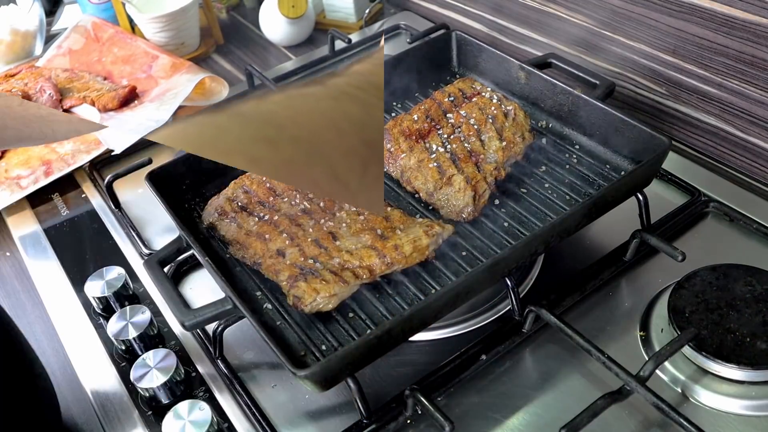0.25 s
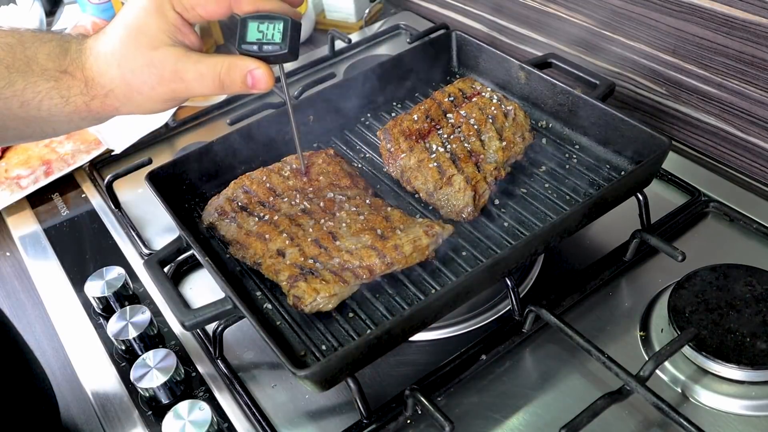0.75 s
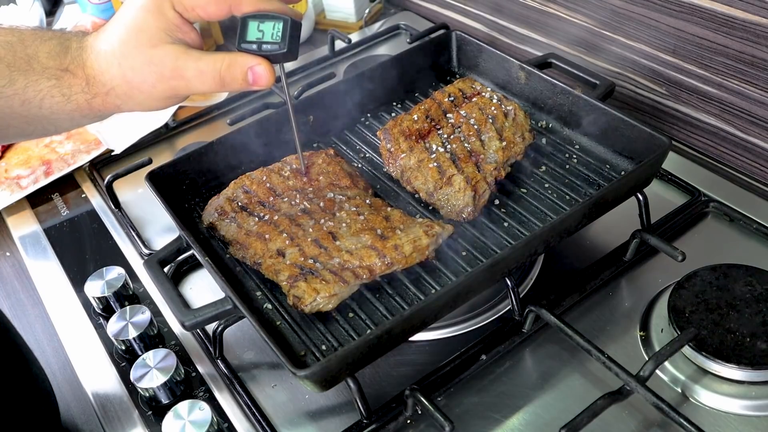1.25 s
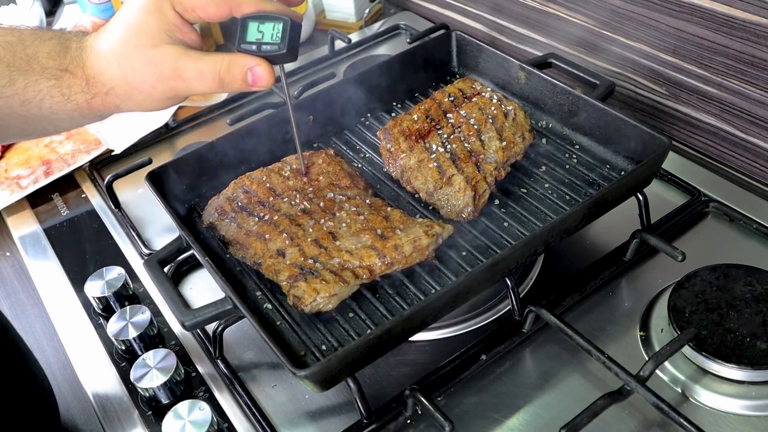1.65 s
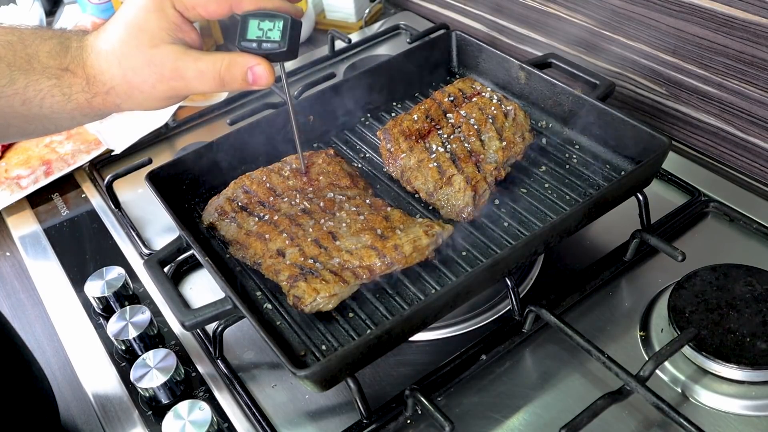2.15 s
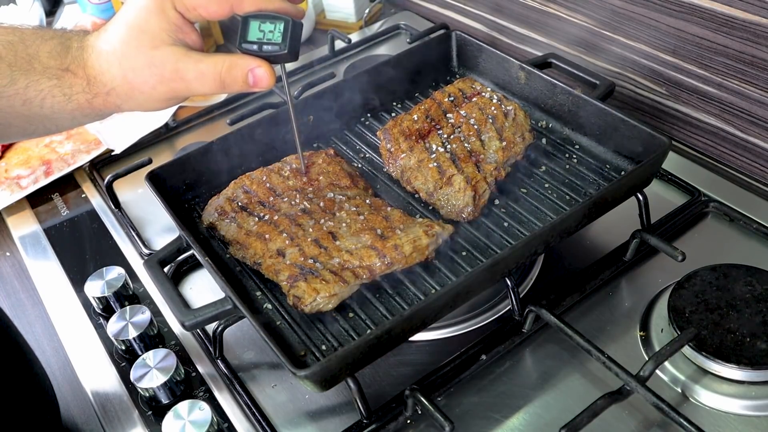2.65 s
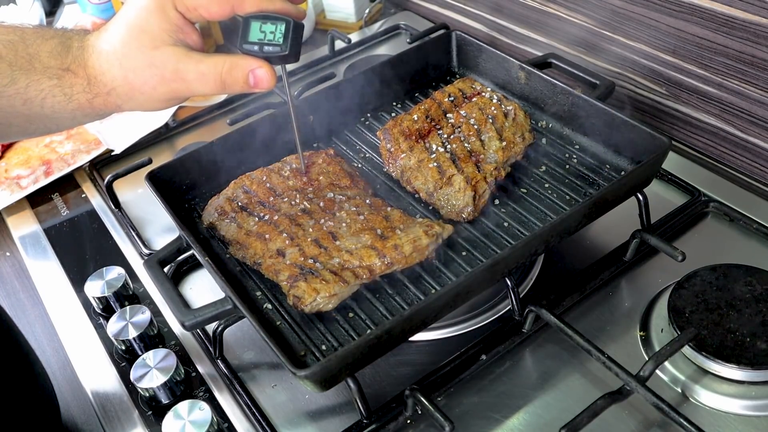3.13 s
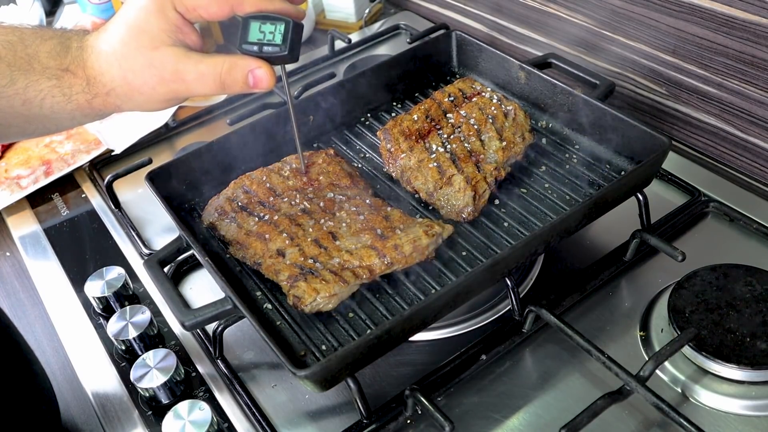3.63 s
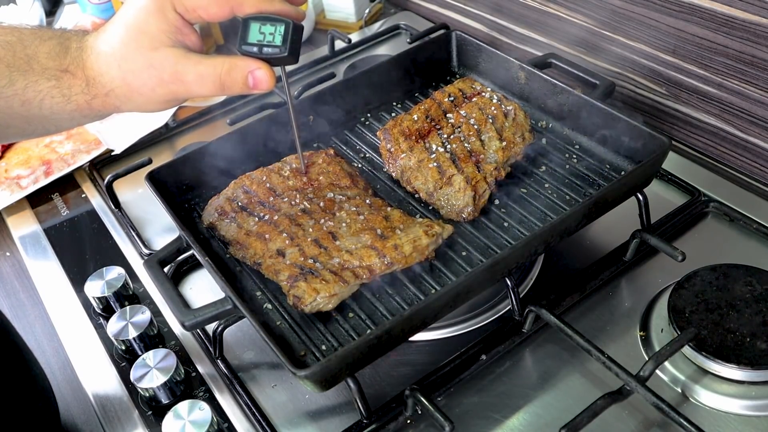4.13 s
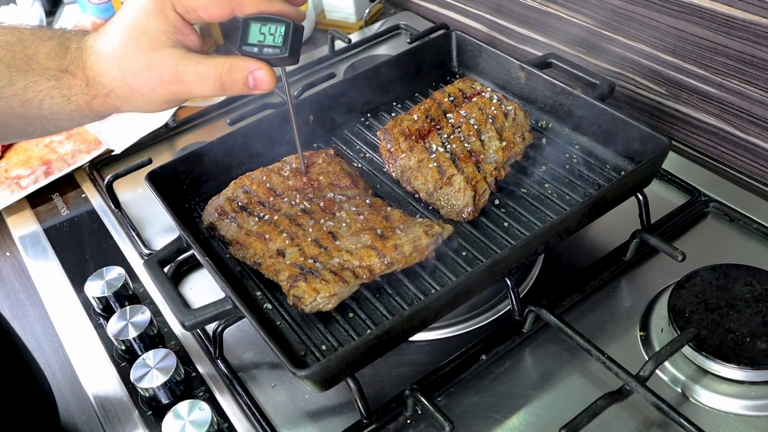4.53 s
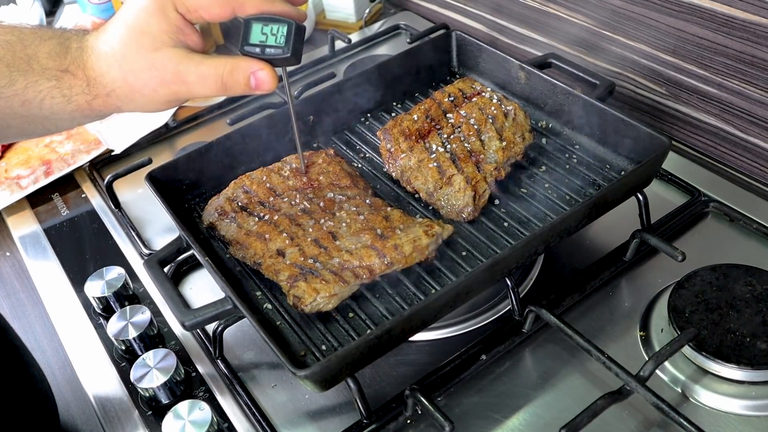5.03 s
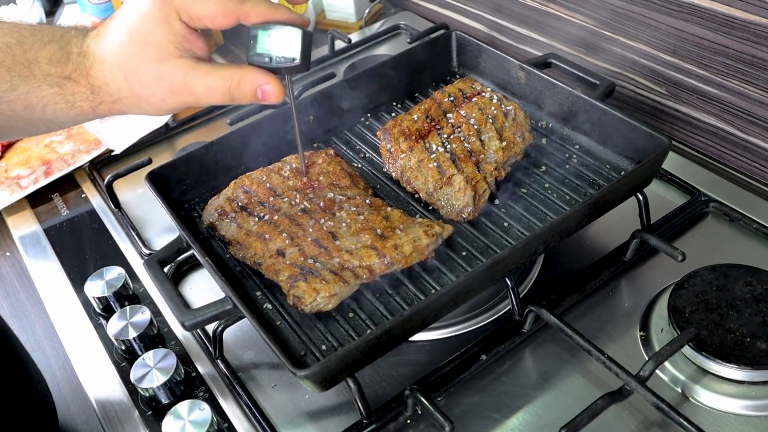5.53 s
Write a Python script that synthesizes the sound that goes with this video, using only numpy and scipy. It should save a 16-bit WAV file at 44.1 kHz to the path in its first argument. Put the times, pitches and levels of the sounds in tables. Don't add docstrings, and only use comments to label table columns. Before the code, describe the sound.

Two steaks fry with a bright continuous hiss, brief sputtering flares and snapping fat, over a soft fan hum in a kitchen.

```python
import sys
import numpy as np
from scipy import signal
from scipy.fft import rfft, irfft, next_fast_len
from scipy.io import wavfile
from scipy.ndimage import uniform_filter1d, map_coordinates

SR = 44100
rng = np.random.default_rng(int(sys.argv[2]) if len(sys.argv) > 2 else 0)


def field_ratio(decibels):
    return 10 ** (np.asarray(decibels, dtype=float) / 20)


def to_wav(s):
    ch = np.atleast_2d(s).T
    pcm = np.round(np.clip(ch, -1, 1) * 32767)
    wavfile.write(sys.argv[1], SR, pcm.astype(np.int16))


N = 255202


def unit(x):
    return x / np.sqrt(np.mean(x ** 2) + 1e-20)


def along(points, hz):
    f, value = np.transpose(points)
    return np.interp(np.log(hz + 1), np.log(f + 1), value)


def wobble(rate):
    knots = rng.standard_normal(int(N * rate / SR) + 4)
    return map_coordinates(knots, [np.arange(N) * rate / SR])


def filtered(x, response):
    size = next_fast_len(len(x) + SR // 2)
    return irfft(rfft(x, size) * response(np.fft.rfftfreq(size, 1 / SR)), size)[:len(x)]


def resonance(f, hz, width):
    return 1j * f * width / (hz * hz - f * f + 1j * f * width)


def patchy(db):
    z = signal.stft(rng.standard_normal(N), nperseg=256)[2]
    field = uniform_filter1d(rng.standard_normal(z.shape), size=6, axis=0)
    field = uniform_filter1d(field, size=5, axis=1)
    uneven = z * field_ratio(np.clip(db, 0, 2) * unit(field))
    return unit(signal.istft(uneven, nperseg=256)[1][:N])


def bursts(rate, spread_db):
    size_db = np.minimum(spread_db * rng.exponential(size=N), 3.5 * spread_db)
    return unit((rng.random(N) < rate / SR) * field_ratio(size_db))


# frequency in Hz, level in dB per Hz.
AIRFLOW = [(15, -30), (30, -10), (50, -13), (80, -3), (100, -1), (116, -2.5), (138, -1), (259, -3.5),
           (310, -1), (479, -2.5), (650, -3.5), (900, 0), (1170, -20), (1980, -120)]
# order (multiple of the shaft speed), level in dB.
SHAFT = [(2, -66), (3, -57), (4, -79), (6, -72), (10, -67)]


def extractor():
    shaft_hz = 20.56 * (1 + 0.0032 * wobble(1.35))
    turn = 2 * np.pi * np.cumsum(shaft_hz) / SR
    hum = sum(field_ratio(db + 4 + 0.92 * wobble(2.64)) * np.sin(order * turn + 5.1 * rng.random())
              for order, db in SHAFT)
    rush = unit(filtered(patchy(0.81), lambda f: field_ratio(along(AIRFLOW, f))))
    return hum + field_ratio(-47.5 + 1.47) * rush


# start in seconds, pitch in Hz, level in dB, length in seconds.
THUDS = [
    (4.916, 270, -45.5, 0.12),
    (4.946, 215, -50, 0.24),
]


def thuds():
    t = np.arange(N) / SR
    out = np.zeros(N)
    for start, hz, db, life in THUDS:
        swell = np.exp(-((t - start - life / 2) / (life / 2)) ** 2)
        rumble = filtered(rng.standard_normal(N), lambda f: resonance(f, hz, .5 * hz) ** 2)
        out += field_ratio(db) * swell * unit(rumble)
    return out


def kitchen(x):
    t60_s = 0.56
    t = np.arange(SR // 2) / SR
    tail = rng.standard_normal(len(t)) * field_ratio(-60 * t / t60_s) * (t > .003)
    wet = signal.fftconvolve(x, tail / np.linalg.norm(tail))[:N]
    return filtered(wet, lambda f: 1 / (1 + 1j * f / 7000))


# delay in seconds, gain (negative flips the pulse).
WALLS = [(0.00034, 0.18), (0.00045, 0.18), (0.00052, 0.25), (0.00068, -0.21), (0.00082, 0.2),
         (0.00091, -0.21), (0.00116, -0.09), (0.00127, 0.1), (0.00134, 0.5), (0.00143, -0.14),
         (0.00159, -0.18), (0.0017, 0.12), (0.00215, 0.16), (0.00234, -0.14), (0.00311, -0.11),
         (0.00404, 0.09)]


def echoes(f, shifts=0., db=0.):
    delay, gain = np.transpose(WALLS)
    return 1 + field_ratio(db) * sum(g * np.exp(-2j * np.pi * f * s) for s, g in zip(delay + shifts, gain))


# frequency in Hz, width in Hz, level in dB.
PAN = [(723, 36, 17.5), (923, 62, 3.5), (1349, 118, 4), (2080, 760, -3.5), (2820, 235, 6),
       (3955, 1100, -5.5), (4740, 130, -2), (6180, 83, -3)]


def iron(f, db):
    return 1 + field_ratio(db) * sum(field_ratio(level) * resonance(f, hz, width) for hz, width, level in PAN)


# time in seconds, vigour in dB.
HEAT = [(0, -26.5), (.2, -27.5), (.6, -25.5), (1.15, -26), (1.95, -25), (2.15, -24.5), (2.35, -24),
        (2.65, -23.5), (2.95, -22.5), (3.3, -24), (4.2, -25), (4.9, -24.5), (5.48, -25), (5.79, -20.5)]
# start in seconds, rise in dB, fade in seconds, fineness from jet 0 to spray 1.
FLARES = [(.17, 4, 0.067, 0.2), (.33, 5, 0.039, .3), (1.5, 2.5, 0.056, .6), (2.25, 7, 0.065, 0.5),
          (2.36, 4, 0.055, 0.1), (2.41, 6, 0.036, 0.3), (2.52, 2, 0.045, .1), (2.87, 3.5, 0.082, .9),
          (3.1, -0.5, 0.054, .1), (3.8, 4.5, 0.13, .55), (4.226, 8, .04, 0.1), (4.28, 3, .06, 0.8),
          (4.62, 1.5, 0.053, 0.5), (4.75, 0.5, .3, .95), (5.2, 2.5, .08, 1)]


def vigour():
    calm_db, attack_s, simmer_share = -26, 0.011, 0.24
    t = np.arange(N) / SR
    flares_db = 0
    for start, db, fade, fine in FLARES:
        shape = np.exp(np.minimum((t - start) / attack_s, (start - t) / fade))
        shares = np.array([[simmer_share], [1 - fine ** 2], [1 - (1 - fine) ** 2]])
        flares_db = flares_db + db * shape * shares
    return np.interp(t, *np.transpose(HEAT)) - calm_db, flares_db


def boiling(spectrum, grain_db, rate, spread_db, patchy_db, echo_db):
    grains = bursts(rate, spread_db) * np.sign(rng.standard_normal(N))
    raw = patchy(patchy_db) + field_ratio(grain_db) * grains
    return unit(filtered(raw, lambda f: field_ratio(along(spectrum, f)) * echoes(f, db=min(echo_db, -6)) * iron(f, -3.2)))


# frequency in Hz, level in dB per Hz.
SIMMER = [(300, -49), (640, -27), (720, -19.5), (1130, -2.5), (1400, -3.5), (1900, -2), (2400, -5),
          (2620, -4.5), (2850, -7.5), (3240, -4), (3800, -2), (5600, -2), (7500, -1), (10400, -18)]
STEAM = [(3500, -27), (5500, -12), (6900, -5), (7700, -0.5), (8400, 1.5), (9100, -1), (10500, -9.5),
         (13000, -53), (20000, -120)]
SPRAY = [(6500, -30), (10000, -8), (11000, -4), (12600, 0), (13600, -1), (14700, -4)]
# calm level in dB, growth in dB per dB of vigour.
LAYERS = [
    (-29.5, 0.39),
    (-29.5, 1.14),
    (-32, 1.07),
]


def sizzle():
    boil_db, flares_db = vigour()
    simmer_db, steam_db, spray_db = [db + growth * boil_db + flare_db
                                     for (db, growth), flare_db in zip(LAYERS, flares_db)]
    sputter = 0.56 * wobble(25.19) + 0.8 * wobble(90)
    simmer = boiling(SIMMER, grain_db=-5.5, rate=900, spread_db=1.5, patchy_db=0.6, echo_db=-20.0)
    steam = boiling(STEAM, grain_db=1.5, rate=2000, spread_db=1.0, patchy_db=1.5, echo_db=-41.0)
    spray = boiling(SPRAY, grain_db=-4, rate=3400, spread_db=6.5, patchy_db=-3.0, echo_db=-47)
    return (field_ratio(simmer_db - 0.44 + 0.76 * sputter + 0.17 * wobble(11)) * simmer
            + field_ratio(steam_db - 1.63 + 0.49 * sputter + 0.29 * wobble(40)) * steam
            + field_ratio(spray_db - 0.45 + 1.2 * sputter + 0.3 * wobble(40)) * spray)


# centre in Hz, width in Hz.
BUBBLES = [
    (2200, 4000),
    (3800, 1600),
    (5800, 1900),
    (8500, 1950),
]


def pop(levels_db, shifts):
    f = np.fft.rfftfreq(512, 1 / SR)
    colour = [(hz, db - 10 * np.log10(width)) for db, (hz, width) in zip(levels_db, BUBBLES)]
    low, high = colour[0][1], colour[-1][1]
    colour = [(500, low - 20), (1200, low - 2.5), *colour,
              (10600, high - 9), (13000, high - 8), (20000, high - 25)]
    cepstrum = irfft(np.log(field_ratio(along(colour, f))))
    cepstrum = cepstrum * np.r_[1, np.full(255, 2), 1, np.zeros(255)]
    pulse = irfft(-np.exp(rfft(cepstrum)) * echoes(f, shifts, 2.5))
    return pulse / np.linalg.norm(pulse) * np.linalg.norm(field_ratio(np.array(levels_db) + 19))


# start in seconds, level in dB, radius in mm, fall in dB an octave from the pitch.
POPS = [(.1606, -28, 1.5, 11), (1.3244, -25, 1.6, 8), (1.5526, -24, .44, 3), (1.8779, -23, 1.1, 7),
        (2.0202, -23.5, 0.4, 3), (2.0655, -21, 1.3, 3), (2.1249, -21, 1.1, 3), (2.1323, -16.5, 0.52, 2.2),
        (2.6762, -21, 1.4, 6), (2.8449, -20.5, 0.47, 4), (2.9361, -21.5, 1.5, 4), (3.0892, -24.5, 1, 6),
        (3.2173, -27, 1, 13), (3.272, -22.5, .75, 4), (3.376, -25.5, 1.2, 6), (3.5642, -24, 1.4, 4),
        (3.7355, -21, 0.59, 4), (3.8032, -22, 0.74, 7), (3.9043, -25, 1.4, 10), (3.9055, -18.5, 1.1, 3),
        (3.9714, -19.5, 1.2, 4), (4.1557, -22.5, 1.7, 11), (4.2269, -31, 0.97, 0), (4.4844, -15.5, 1.22, 9),
        (4.7333, -17, 1.66, 9), (4.8509, -16, 1.28, 12), (4.8898, -24, 1.5, 11), (5.0464, -20.5, 1.5, 5),
        (5.4898, -14, 0.46, 5.5), (5.7578, -20, 1.2, 1.8)]
# start in seconds, level in dB, radius in mm.
MORE_POPS = [(.2202, -24, .38), (0.3386, -23, .4), (.5137, -24, .39), (0.535, -19, 0.38), (0.5807, -24.5, 0.8),
             (.6144, -26, 0.55), (1.092, -22, .4), (1.3546, -24, .5), (2.1437, -23, 0.41), (2.189, -21, 0.34),
             (2.323, -23, 0.53), (2.4995, -29, .42), (2.5543, -15, 0.32), (2.7355, -23, 0.96),
             (2.7423, -17.5, .4), (3.1429, -20, 0.32), (3.6847, -26, 0.4), (3.9283, -17.5, 0.34),
             (4.2326, -18, .46), (4.3501, -23, .37), (4.5389, -22.5, .76), (4.587, -20, .52),
             (4.6068, -23, 0.6), (4.6268, -21, 0.49), (5.0139, -25, .8), (5.2591, -17.5, 0.32),
             (5.5726, -22, .62), (5.6316, -18, 0.42), (5.647, -20, 0.71), (5.7263, -22, 0.63)]
# radius in mm, level in dB, fall in dB an octave from the pitch.
PATTER = [
    (1.5, -58, 8),
    (1.16, -59, 5.5),
    (0.74, -57, 14.5),
    (0.58, -59.5, 5),
    (0.57, -62, 8),
    (0.36, -62.5, 12),
]


def pops():
    def size_levels(db, mm, fall_db):
        octaves = np.log2(np.transpose(BUBBLES)[0] * mm / 3260)
        return db - fall_db * np.abs(octaves)

    rows = POPS + [(*row, 9.5) for row in MORE_POPS]
    spots = 1.8e-5 * rng.standard_normal((len(rows) + len(PATTER), len(WALLS)))
    chance_db = 0.8 * rng.standard_normal((len(rows), len(BUBBLES)))
    single = np.zeros(N + 512)
    for (start, db, mm, fall_db), shifts, luck_db in zip(rows, spots, chance_db):
        single[round(start * SR):][:512] += pop(size_levels(db, mm, fall_db) + luck_db, shifts)
    patter = np.zeros(N)
    for (mm, db, fall_db), shifts in zip(PATTER, spots[len(rows):]):
        small = pop(size_levels(db, mm, fall_db), 3 * shifts)
        patter += signal.fftconvolve(bursts(35, 2.5), small)[:N]
    lively_db = 1.13 * vigour()[0] - 8
    return filtered(single[:N] * field_ratio(0.38) + field_ratio(lively_db) * patter, lambda f: iron(f, -13))


def arm_shade():
    gone_s, move_s = 0.14, 0.02
    return field_ratio(-1 * np.clip((gone_s - np.arange(N) / SR) / move_s, 0, 1))


def scene():
    bubbles = pops()
    pan = arm_shade() * sizzle() + bubbles
    mono = pan + field_ratio(-5) * kitchen(bubbles) + extractor() + thuds()
    return np.array([mono, mono])


# time in seconds, low edge in Hz, high edge in Hz, level in dB.
FLECKS = [(0.3105, 10960, 13140, -41), (0.3105, 14410, 15890, -46), (0.473, 6880, 9690, -33),
          (0.473, 14460, 15350, -47), (2.377, 12340, 13840, -40), (2.586, 4160, 5220, -41),
          (2.586, 5610, 6950, -38), (3.1897, 8200, 9690, -38), (3.1897, 11660, 13120, -39),
          (4.1882, 6850, 9000, -36), (4.1882, 11000, 12300, -47), (5.326, 9500, 11000, -42),
          (5.3956, 7520, 9010, -37)]


def flecks(top_hz):
    size, offset = 2048, 379
    side, n = np.zeros(N), np.arange(size)
    fade = np.sin(np.pi * (n + .5) / size)
    for s, lo_hz, hi_hz, db in FLECKS:
        k = np.arange(round(lo_hz * size / SR), round(min(hi_hz, top_hz) * size / SR))
        lines = np.cos(2 * np.pi / size * np.outer(n + .5 + size / 4, k + .5))
        start = round((s * SR - offset) / (size / 2) - 1) * size // 2 + offset
        side[start:][:size] += field_ratio(db) * unit(lines @ rng.standard_normal(len(k))) * fade
    return side


def band_limit(x):
    return signal.sosfilt(signal.butter(12, 17000, fs=SR, output="sos"), x)


def record(dry):
    ceiling, top_hz = 1.05, 15730
    side = flecks(top_hz)
    limited = dry[0] / (1 + (dry[0] / ceiling) ** 4) ** (1 / 4)
    mono = filtered(limited, lambda f: f < top_hz)
    return band_limit(mono + np.array([side, -side]))


dry = scene()
out = record(dry)
to_wav(out)
```